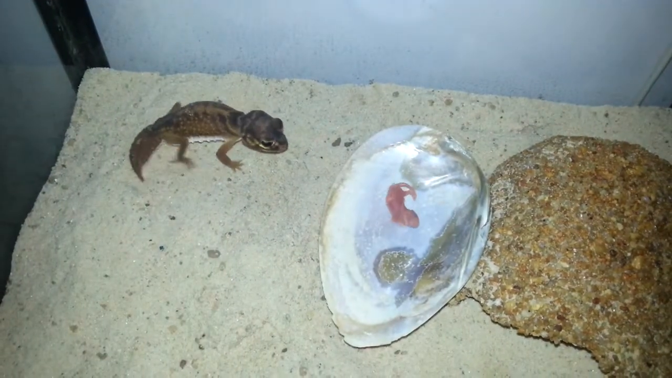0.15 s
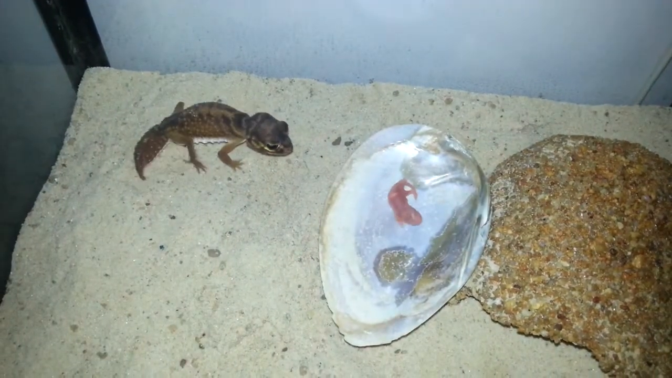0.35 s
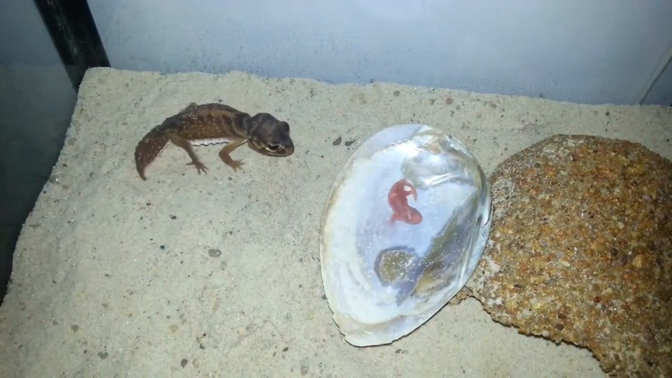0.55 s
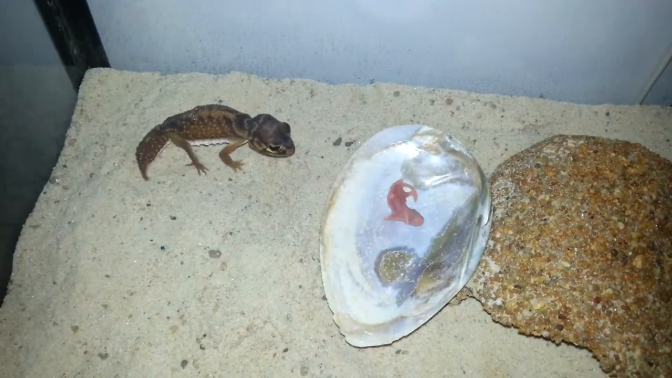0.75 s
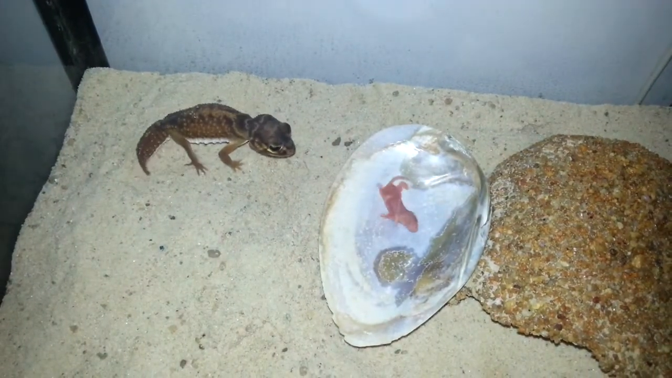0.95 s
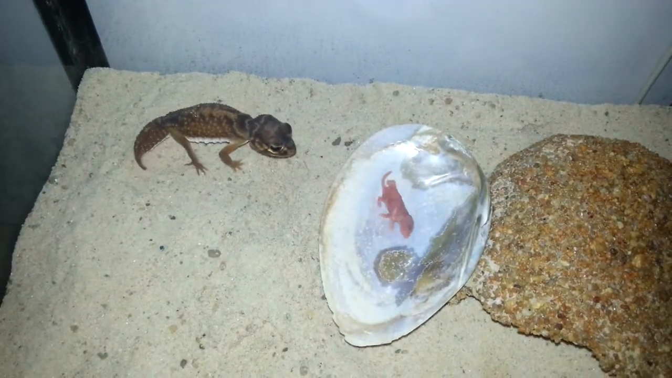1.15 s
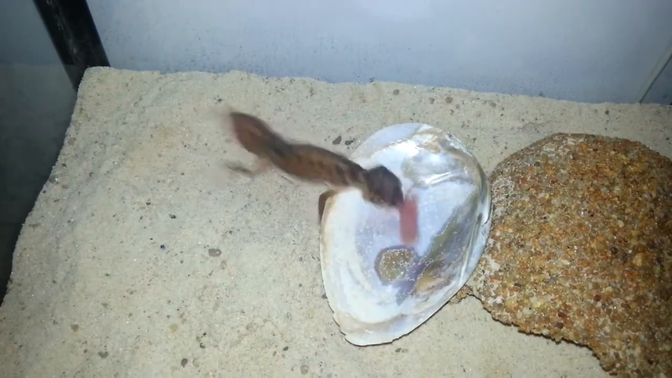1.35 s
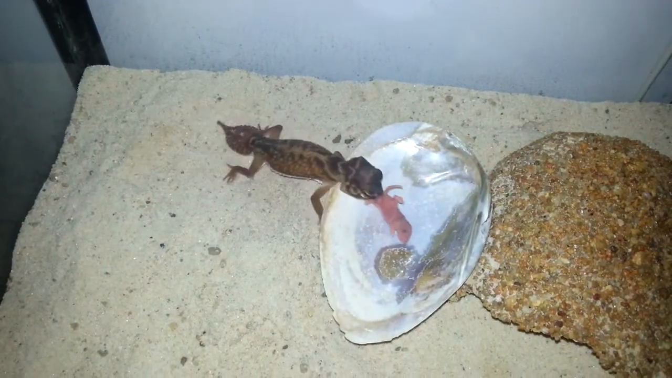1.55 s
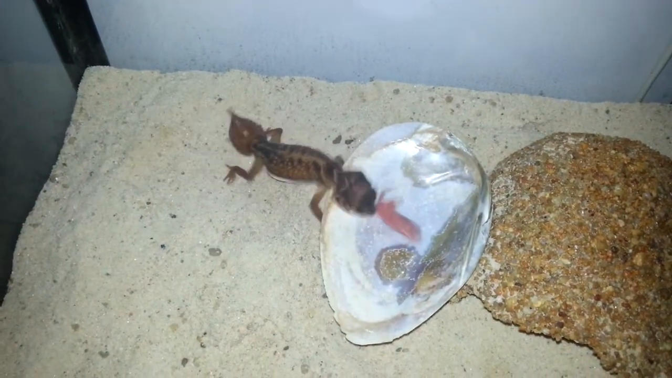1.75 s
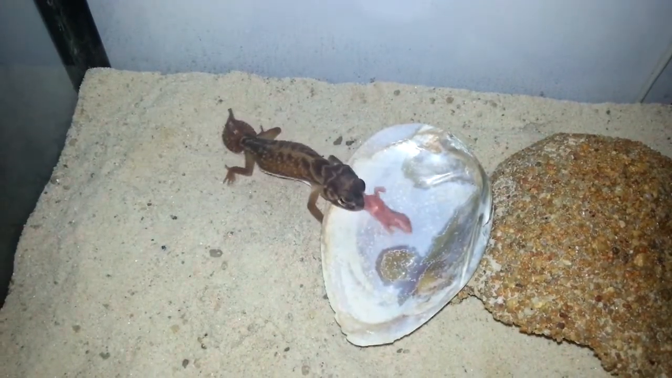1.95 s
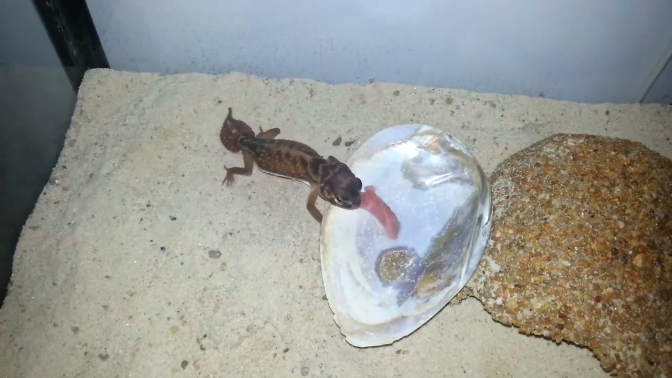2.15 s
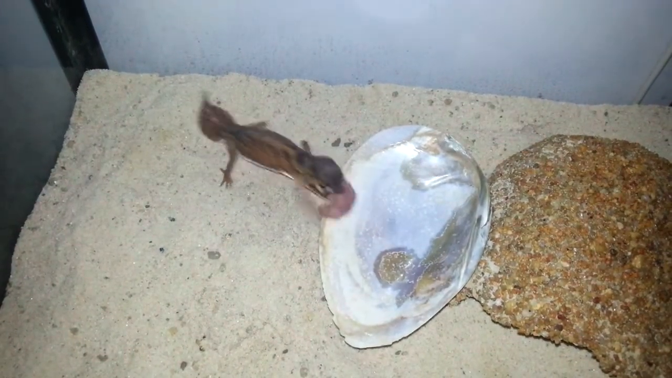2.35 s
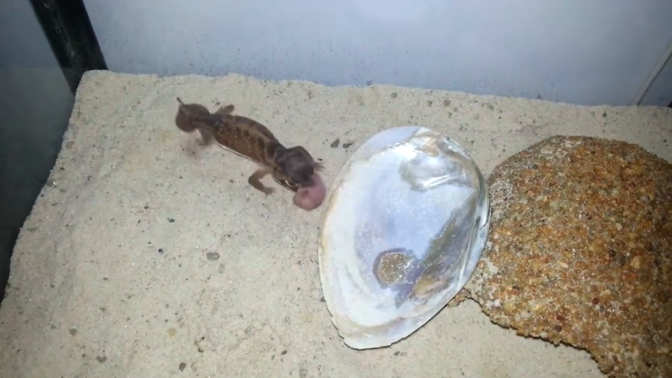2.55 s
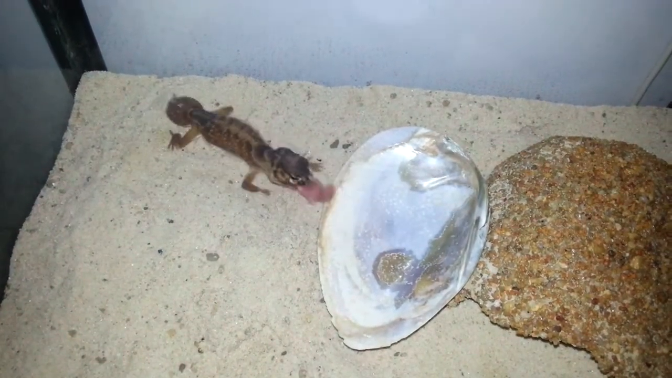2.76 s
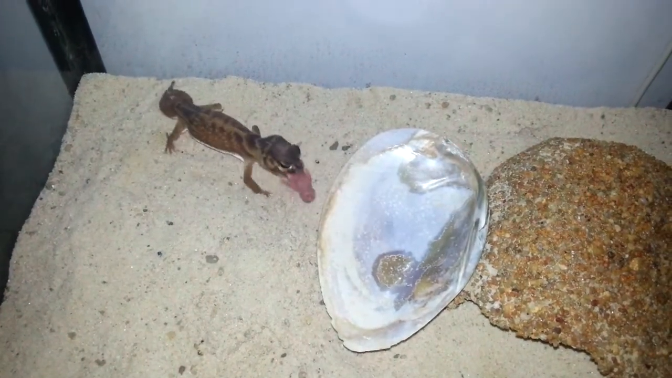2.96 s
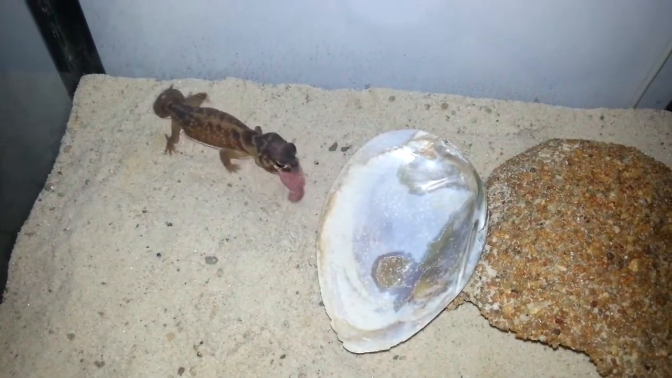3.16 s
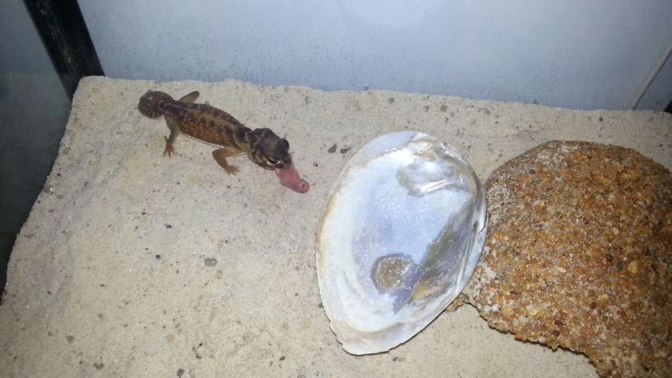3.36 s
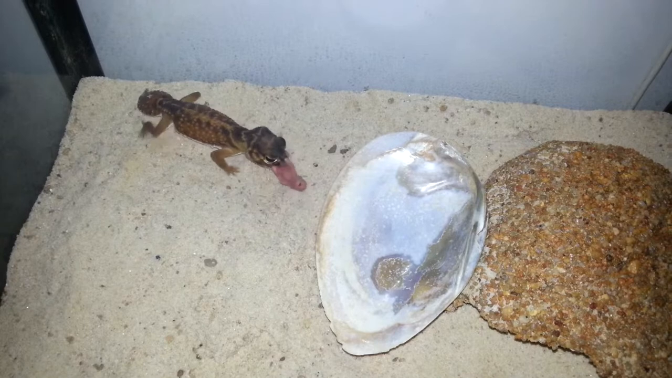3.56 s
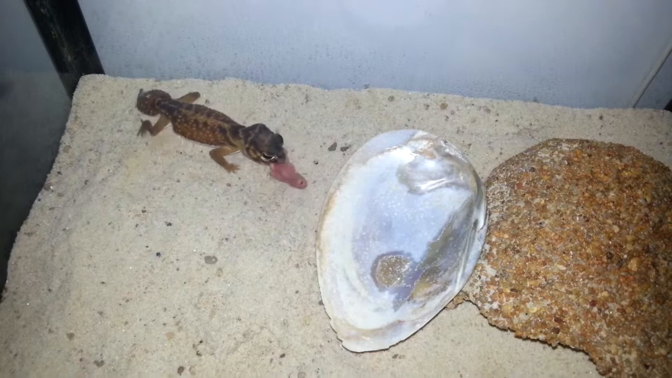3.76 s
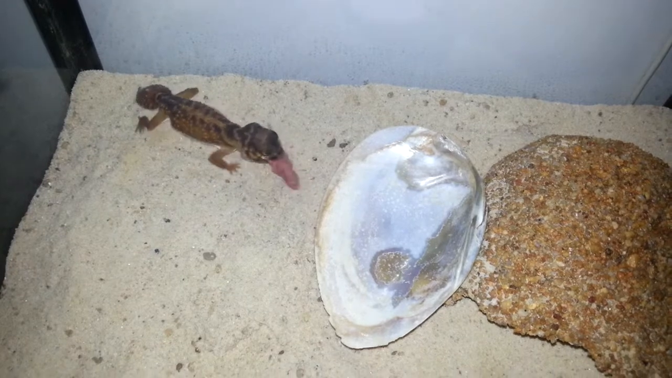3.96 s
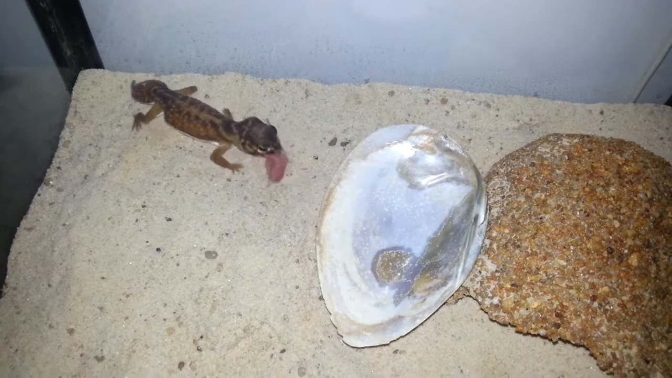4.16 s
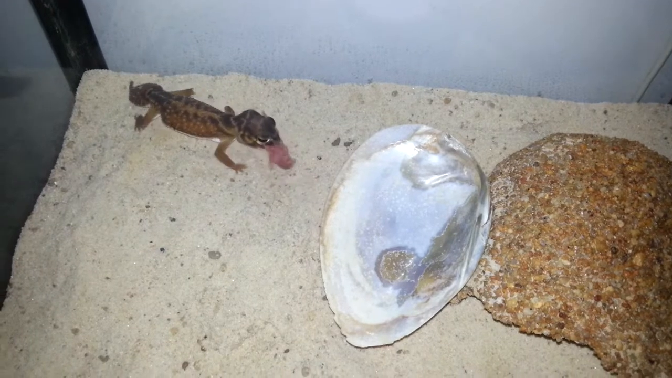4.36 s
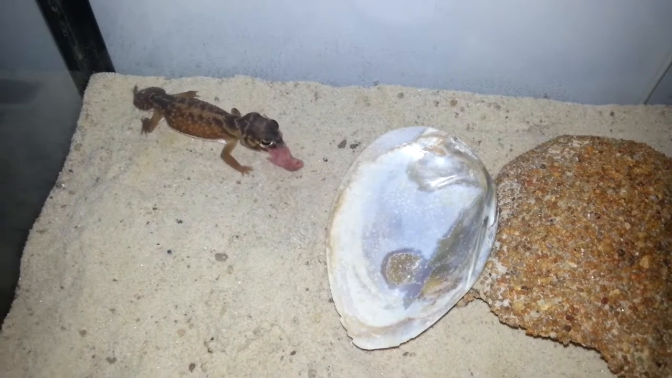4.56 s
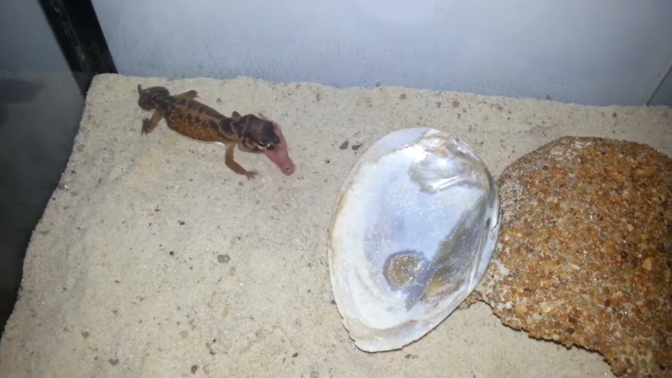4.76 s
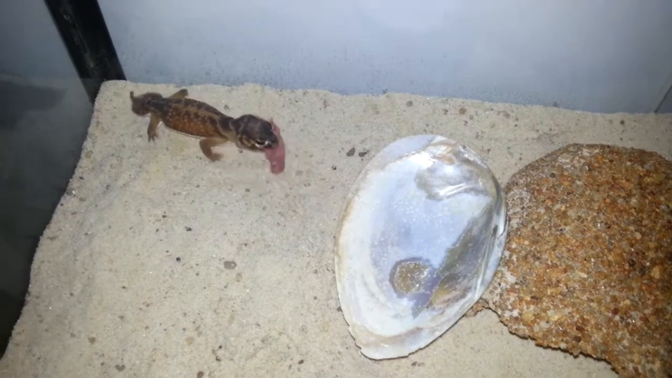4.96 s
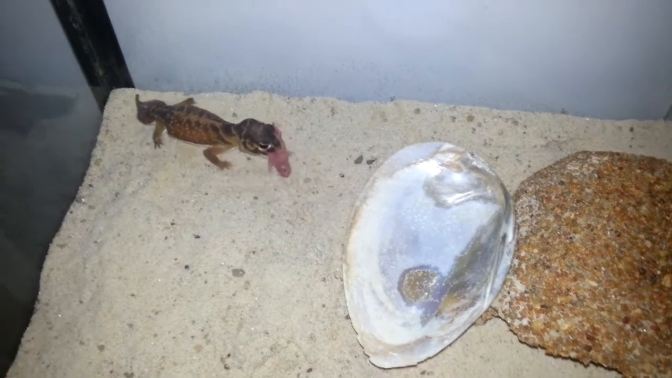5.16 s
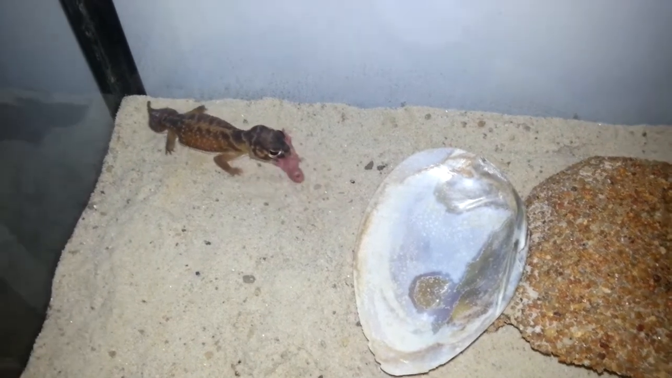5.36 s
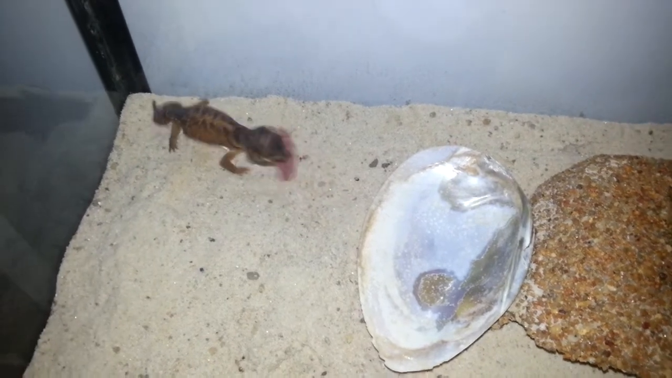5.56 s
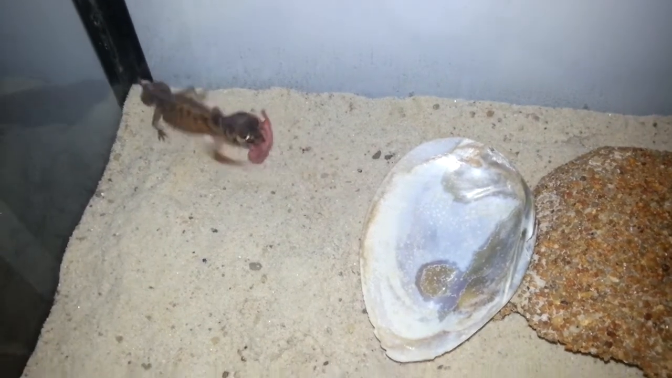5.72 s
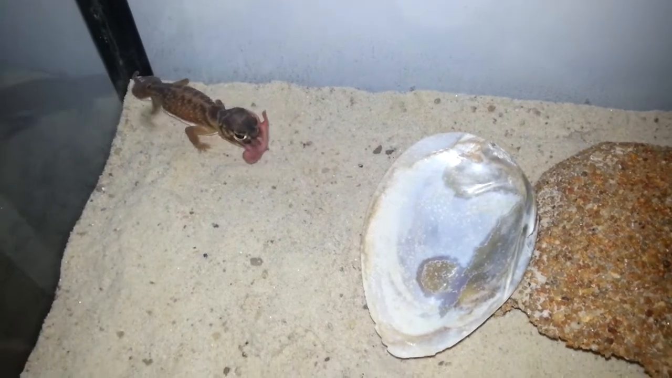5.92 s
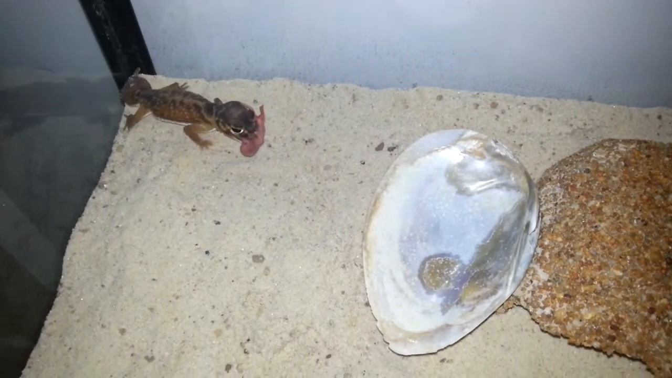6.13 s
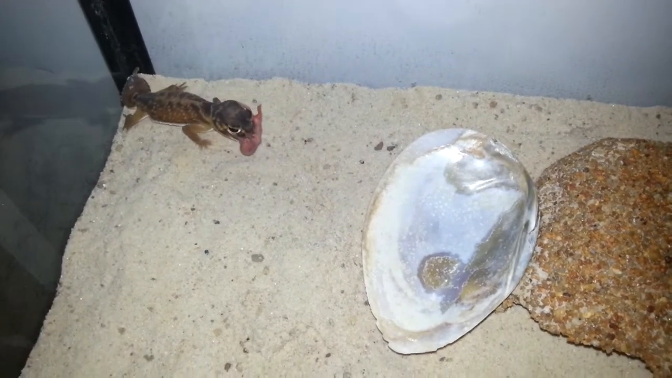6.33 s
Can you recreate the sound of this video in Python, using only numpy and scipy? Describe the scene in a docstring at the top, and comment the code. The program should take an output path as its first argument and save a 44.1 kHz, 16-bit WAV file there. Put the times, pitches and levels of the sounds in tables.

```python
"""Gecko squeaking over its prey

A small gecko seizes its prey in a sand-floored glass tank and squeaks while gripping it.
Each squeak is a thin, arching whistle from the larynx that frays into a hiss of air.
Feet and jaws tick on a shell dish and on the sand. The glass walls add quick echoes,
and the room hums quietly behind."""
import sys
import numpy as np
from scipy import signal
from scipy.fft import rfft, irfft
from scipy.io import wavfile
from scipy.ndimage import map_coordinates

SR = 44100
rng = np.random.default_rng(int(sys.argv[2]) if len(sys.argv) > 2 else 0)


def generate_wav(sig):
    """Save sig (samples, or channels by samples) to the path in sys.argv[1] as 16-bit PCM at SR."""
    pcm = np.round(np.clip(np.atleast_2d(sig).T, -1, 1) * 32767).astype(np.int16)
    wavfile.write(sys.argv[1], SR, pcm)


N = 281799
TIME = np.arange(N) / SR
FREQS = np.maximum(np.fft.rfftfreq(N, 1 / SR), 1)


def from_db(db):
    """Decibels to gain."""
    return 10 ** (np.asarray(db) / 20)


def rms_one(x):
    """Scale to unit power."""
    return x / np.sqrt(np.mean(x ** 2) + 1e-20)


def at_hz(curve, hz):
    """Read a curve on a log-frequency axis."""
    f, value = np.transpose(curve)
    return np.interp(np.log(hz), np.log(f), value)


def band(x, low_hz, high_hz):
    """Causal band-pass."""
    sos = signal.butter(2, [low_hz, min(high_hz, .45 * SR)], "band", fs=SR, output="sos")
    return signal.sosfilt(sos, x + 1e-18)


def noise(colour):
    """Unit-power noise shaped by an EQ curve."""
    return rms_one(irfft(rfft(rng.standard_normal(N)) * from_db(at_hz(colour, FREQS)), N))


def band_noise(low_hz, high_hz):
    """Unit-power noise in one band."""
    return rms_one(band(rng.standard_normal(N), low_hz, high_hz))


def wobble(rate_hz):
    """Unit-power random modulation up to about `rate_hz`."""
    return rms_one(irfft(rfft(rng.standard_normal(N)) / (1 + (FREQS / rate_hz) ** 4), N))


def gate(t, length, attack, release):
    """Open at t = 0, hold, close after `length`."""
    return np.clip(t / attack, 0, 1) * np.clip((length - t) / release + 1, 0, 1)


def strikes(cues, t60):
    """An envelope that jumps at each cue and dies away."""
    impulses = np.zeros(N)
    for start, db in cues:
        impulses[round(start * SR)] += from_db(db)
    return signal.lfilter([1], [1, -from_db(-60 / (t60 * SR))], impulses + 1e-18)


def bursts(cues, edge_s):
    """Soft-edged envelopes that sag over their length."""
    out = np.zeros(N)
    for start, length, db, fall_db in cues:
        t = TIME - start
        out += gate(t, length, edge_s, edge_s) * from_db(db - fall_db * np.clip(t / length, 0, 1))
    return out


def pitch_arch(t, rise, length, first_hz, top_hz, last_hz, bend):
    """The pitch shoots up, levels off, then heads for its last note; bend 1 is a straight line."""
    climb = np.clip(1 - t / rise, 0, 1) ** 2.8
    fall = np.clip((t - rise) / max(length - rise, 1 / SR), 0, 1) ** bend
    return top_hz - (top_hz - first_hz) * climb - (top_hz - last_hz) * fall


# Squeaks, the last split into two notes: t/s, rise/s, length/s, first f/Hz, top f/Hz, last f/Hz, bend,
# tremor/share of pitch, rasp/rad, tone/dB, crescendo/dB, overtones/dB,
# hiss/dB, hiss tail/s, sizzle/dB, snap/dB
SQUEAKS = [ (2.3286, 0.013, 0.059, 3570, 5830, 3890, 0.76, 0.031, 0.2, -14.5, -2, -2, -60, 0.0028, -26, -24),
           (3.3483, 0.021, 0.053, 2436, 3580, 1960, 2, 0.01, 0.11, -33, -9, 3, -33, 0.085, -31, -35),
           (3.7121, 0.029, 0.047, 2460, 4044, 3160, 1.16, 0.0047, 0.19, -33.5, -0.5, 5, -43, 0.011, -35.5, -34),
           (4.12, 0.021, 0.03, 1877, 2474, 2250, 0.68, 0.02, 0.19, -37.5, 1, 5.5, -33.5, 0.057, -31.5, -31),
           (4.593, 0.031, 0.057, 2425, 3764, 3160, 1.46, 0.0092, 0.11, -32.5, 1, 2, -34.5, 0.053, -28.5, -28),
           (4.7618, 0.0053, 0.01, 2890, 3346, 3420, 1.9, .01, 0.21, -29, 9.5, 0, -34, 0.0014, -31, -38),
           (4.7697, 0.0042, 0.015, 3770, 4500, 3800, 1.03, 0.0078, 0.52, -32.5, -3, -1, -43, 0.0078, -44, -41)]
# Whistle harmonics: multiple, level/dB
HARMONICS = [(1, -3.5), (2, -6), (3, -8), (4, -4.5), (5, -10)]
# Mouth resonances that the whistle sweeps through: f/Hz, level/dB
MOUTH_EQ = [(2000, -0.5), (4200, 2), (7000, -2.5), (7900, 1), (9000, -5), (10300, -1), (11700, 4),
            (13000, -1.5), (14300, -5)]
ATTACK_S, RELEASE_S = 0.0012, 0.001
TREMOR_HZ, EDGE_SAG_DB = 51.6, 6.5


def whistle():
    """A tiny larynx whistles a trembling arch of pitch, weaker at both ends."""
    tone = np.zeros(N)
    jitter = 1 + .013 * wobble(720)
    shimmer = from_db(1.8 * wobble(440))
    roughness = wobble(720)   # uneven cycles fray the high overtones most
    for squeak in SQUEAKS:
        start, rise, length, *contour = squeak[:7]
        tremor, rasp, level_db, crescendo_db, overtones_db, _, tail = squeak[7:14]
        on = (TIME > start) & (TIME < start + length + tail + RELEASE_S)
        t = TIME[on] - start
        hz = pitch_arch(t, rise, length, *contour) * jitter[on]
        hz *= 1 + tremor * np.cos(2 * np.pi * TREMOR_HZ * (t - rise))
        phase = 2 * np.pi * np.cumsum(hz) / SR + rasp * roughness[on]
        progress = np.clip(t / length, 0, 1)
        effort = np.sin(np.pi * progress)
        swell_db = level_db + crescendo_db * (progress - .5) - EDGE_SAG_DB * (1.5 - effort)
        swell = gate(t, length, ATTACK_S, RELEASE_S) * from_db(swell_db)
        for k, db in HARMONICS:
            colour_db = db + (k > 1) * overtones_db + at_hz(MOUTH_EQ, k * hz)
            tone[on] += swell * from_db(colour_db) * np.sin(k * phase) * (k * hz < SR / 2)
    return np.sqrt(2) * shimmer * tone


# Voiceless hisses: t/s, length/s, hiss/dB, fall/dB, sizzle/dB, snap/dB
HISSES = [(2.817, 0.074, -37, 23, -31.5, -33.5), (3.798, 0.066, -44.5, 2.5, -44, -55)]
# Colour of the breath: f/Hz, level/dB
BREATH_EQ = [(500, -39), (1400, -20.5), (2200, -14), (3400, -11.5), (4700, -9), (6200, -13), (8300, -12),
             (10500, -16.5), (12300, -13), (13200, -17), (14200, -9), (15500, -7)]
HISS_DUCK_DB, HISS_FALL_DB_PER_S, SIZZLE_FALL_DB_PER_S = 10, 176, 151


def mouth_hiss(breath_db):
    """Air hisses through the mouth, grainy with saliva, with a narrow sizzling resonance on top."""
    air = bursts([(s, length, db, fall) for s, length, db, fall, _, _ in HISSES], edge_s=0.0023)
    jet = bursts([(s, length, db, fall) for s, length, _, fall, db, _ in HISSES], edge_s=0.0015)
    for start, _, length, *_, air_db, tail, sizzle_db, _ in SQUEAKS:
        on = (TIME > start) & (TIME < start + length + tail + RELEASE_S)
        t = TIME[on] - start
        flow = gate(t, length + tail, ATTACK_S, RELEASE_S)
        duck_db = HISS_DUCK_DB * (1 - np.clip(t / length, 0, 1) ** 3)   # lifts as the whistle frays
        fade_db = HISS_FALL_DB_PER_S * np.maximum(t - length, 0)   # the air runs out
        air[on] += flow * from_db(air_db - duck_db - fade_db)
        jet[on] += flow * from_db(sizzle_db - SIZZLE_FALL_DB_PER_S * t)
    saliva = from_db(1.23 * wobble(540))
    sizzle = jet * band_noise(13240, 14770)
    breath = air * from_db(breath_db) * noise(BREATH_EQ)
    return saliva * (breath + sizzle)


def jaw_snaps():
    """The jaws part with a bright snap at the start of each squeak and hiss."""
    openings = [(row[0], row[-1]) for row in SQUEAKS + HISSES]
    return strikes(openings, t60=0.03) * band_noise(7500, 18000)


# Low accent inside the loudest squeak: t/s, length/s, level/dB, fall/dB
BUZZ = [(2.343, 0.029, -31.5, 19)]
# Colour of its thud: f/Hz, level/dB
THUD_EQ = [(90, -19.5), (170, 3), (400, -3), (650, -18.5), (1400, -11.5), (2200, -27), (3500, -53)]


def low_buzz(pitch_hz, sink_per_s, buzz_db, thud_db):
    """A dull thud with a short, rough, sinking buzz, far below the whistle."""
    start, length = BUZZ[0][:2]
    hz = pitch_hz * (1 - sink_per_s * np.clip(TIME - start, 0, length))
    hz *= 1 + .045 * wobble(356)
    phase = 2 * np.pi * np.cumsum(hz) / SR
    buzz = sum(from_db(-3 * k) * np.sin((k + 1) * phase) for k in range(4))
    return bursts(BUZZ, edge_s=0.004) * (from_db(buzz_db) * buzz + from_db(thud_db) * noise(THUD_EQ))


# Hits on the dish and the tank: t/s, knock/dB, shell ring/dB
KNOCKS = [(1.387, -33, -56), (1.408, -31, -50), (1.4207, -18.5, -28), (1.7931, -21.5, -52),
          (2.7682, -31.5, -62), (5.6204, -38, -54), (5.665, -39, -58), (5.6887, -38, -46)]
# Colour of a knock: f/Hz, level/dB
KNOCK_EQ = [(500, -29), (1500, 4), (2200, -7), (2700, 0), (3300, 6.5), (4500, 3), (6000, -22), (9000, -26),
            (15000, -10)]


def knocks():
    """Feet and jaws strike: a dry crack, a faint tail and the high ring of the shell."""
    blows = [(s, db) for s, db, _ in KNOCKS]
    rings = [(s, db) for s, _, db in KNOCKS]
    crack = from_db(-8) * strikes(blows, t60=0.0054)
    tail = from_db(-25) * strikes(blows, t60=0.1)
    shell = strikes(rings, t60=0.01) * band_noise(2760, 4560)
    return (crack + tail) * noise(KNOCK_EQ) + shell


# Claw strokes: t/s, level/dB
SCRATCHES = [(0.134, -53.5), (0.312, -55.5), (0.686, -54.5), (0.811, -55), (1.776, -52), (1.967, -55),
             (2.972, -48.5), (3.973, -54.5), (4.025, -55), (4.385, -56), (5.068, -54)]
# Colour of the grit: f/Hz, level/dB
GRIT_EQ = [(600, -11), (1500, 1), (2600, -5.5), (3600, 3.5), (5000, -5), (7000, -11), (15000, -9)]


def claw_scratches():
    """Claws scratch the sand in short, gritty strokes."""
    grit = rms_one(noise(GRIT_EQ) * from_db(5.4 * wobble(810)))
    return strikes(SCRATCHES, t60=0.044) * grit


# Bright ticks: t/s, level/dB
TICKS = [(0.134, -51), (1.43, -50), (1.785, -41.5), (1.794, -48), (2.075, -47), (2.516, -43), (2.888, -48),
         (3.055, -47), (3.073, -47), (3.455, -44), (3.465, -46), (4.210, -39.5), (4.227, -39.5),
         (5.524, -62), (5.667, -47)]
# Dull taps: t/s, level/dB
TAPS = [(1.793, -30), (2.482, -33), (5.419, -45), (5.524, -31.5)]


def ticks_and_taps():
    """The wet mouth and flicked grains tick, among a few dull taps."""
    ticks = strikes(TICKS, t60=0.018) * band_noise(1300, 21000)
    taps = strikes(TAPS, t60=0.01) * band_noise(420, 1600)
    return ticks + taps


# Scuffs: t/s, length/s, level/dB, fall/dB
SCUFFS = [(1.406, 0.0074, -45, 4), (1.422, 0.23, -45.5, 37), (2.39, 0.17, -50.5, 9.5),
          (5.65, 0.162, -52.5, 14)]
# Colour of the sand: f/Hz, level/dB
SAND_EQ = [(200, 13.5), (800, 5.5), (3000, -5), (6000, -1), (10000, -3), (15000, -6)]


def sand_scuffs():
    """Scuffed sand gives a grainy, fading rustle."""
    return bursts(SCUFFS, edge_s=0.0031) * noise(SAND_EQ) * from_db(3.2 * wobble(237))


# The landing: t/s, length/s, level/dB, fall/dB
LUNGE = [(1.424, 0.174, -50, 9)]


def lunge():
    """The body lands and the tank floor rumbles."""
    return bursts(LUNGE, edge_s=.012) * band_noise(98, 280)


def delay_response(ms):
    """Frequency response of a pure delay."""
    return np.exp(-2j * np.pi * FREQS * ms / 1000)


def scatter(x, loops_ms, feedback=.72):
    """All-pass loops smear the sound over a few milliseconds without colouring it."""
    for ms in loops_ms:
        trip = delay_response(ms)
        x = irfft(rfft(x) * (feedback + trip) / (1 + feedback * trip), N)
    return x


# Reflections off the glass: left delay/ms, right delay/ms, level/dB
GLASS_ECHOES = [(.35, .8, -9), (1.9, 1.3, -12), (3.1, 3.6, -16)]
# Stereo tilt, applied 1.5 times on the left and 0.5 times on the right: f/Hz, left minus right/dB
STEREO_TILT = [(60, -25.5), (99, 6.5), (160, 0), (270, -9), (450, -2.5), (740, -3), (1220, -2), (2010, 2),
               (3330, 3.5), (5500, -1), (9080, 1), (15000, -4.5)]
RING_DB, RING_T60_S = -10, .04
ROOM_DB, ROOM_T60_S = -21, .22


def tank(x, pan_db, lag_ms):
    """Two microphones hear the direct sound, the nearest panes, the ringing tank and a faint room."""
    late = map_coordinates(x, [np.arange(N) - lag_ms * SR / 1000], order=5)
    left = scatter(late * from_db(pan_db / 2), loops_ms=(.21, .59))
    right = scatter(x * from_db(-pan_db / 2), loops_ms=(.33, .47))
    t = TIME[:SR // 2]
    out = []
    for side, direct in enumerate([left, right]):
        panes = sum(from_db(echo[2]) * delay_response(echo[side]) for echo in GLASS_ECHOES)
        heard = direct + irfft(rfft(direct) * panes, N)
        for db, t60, top_hz in [(RING_DB, RING_T60_S, 16000), (ROOM_DB, ROOM_T60_S, 13000)]:
            tail = band(rng.standard_normal(len(t)), 100, top_hz) * from_db(-60 * t / t60) * (t > .001)
            heard += from_db(db) * signal.fftconvolve(direct, tail / np.linalg.norm(tail))[:N]
        tilt = from_db((1.5 - side) * at_hz(STEREO_TILT, FREQS))
        out.append(irfft(rfft(heard) * tilt, N))
    return np.array(out)


# Head turns: t/s, left minus right/dB, left lag/ms
HEAD_TURNS = [(2.345, -1, 0.078), (2.39, 3, 0.072), (2.83, -0.5, 0.59), (3.38, -0.5, 0.7),
              (3.74, 0.5, 0.77), (4.15, 3.5, 0.74), (4.77, 2, 0.8)]


def head_turns():
    """The turning head shifts the voice's pan and its lag between the microphones."""
    times, pan_db, lag_ms = np.transpose(HEAD_TURNS)
    return np.interp(TIME, times, pan_db), np.interp(TIME, times, lag_ms)


# Colour of the room tone: f/Hz, level/dB
ROOM_EQ = [(15, -83), (25, -17.5), (45, -17), (118, -3.5), (172, -8), (202, -7), (224, -9), (394, -11.5),
           (573, -13.5), (637, -14.5), (2240, -23.5), (2630, -25), (6200, -32), (13800, -29),
           (15000, -40.5)]
# Its fader moves, before the trims: t/s, rumble/dB, hiss/dB
ROOM_FADERS = [(0.0, -63, -69), (4.27, -60, -66.5), (5.53, -60, -67), (6.39, -63, -68.5)]
# Its stereo image: f/Hz, left-right correlation
ROOM_CORRELATION = [(30, 0.22), (120, 0.54), (300, 0.021), (1000, 0.059), (15000, 0.017)]


def room_tone(rumble_trim_db, hiss_trim_db, boom_hz, boom_width_hz, boom_db):
    """The room rumbles with one boomy resonance under a faint hiss."""
    times, rumble_db, hiss_db = np.transpose(ROOM_FADERS)
    resonance_db = boom_db / (1 + ((FREQS - boom_hz) / boom_width_hz) ** 2)
    mid, side = rfft(rng.standard_normal((2, N))) * from_db(at_hz(ROOM_EQ, FREQS) + resonance_db)
    alike = at_hz(ROOM_CORRELATION, FREQS)
    stereo = np.sqrt(1 + alike) * mid + np.sqrt(1 - alike) * side * [[1], [-1]]
    lows = 1 / (1 + (FREQS / 2500) ** 4)
    rumble = rms_one(irfft(stereo * lows, N)) * from_db(np.interp(TIME, times, rumble_db))
    hiss = rms_one(irfft(stereo * (1 - lows), N)) * from_db(np.interp(TIME, times, hiss_db))
    return from_db(rumble_trim_db) * rumble + from_db(hiss_trim_db) * hiss


# Motor partials, before the trim: f/Hz, level/dB
HUM_PARTIALS = [(199.2, -73.5), (398.4, -79.5)]


def motor_hum(trim_db):
    """A motor hums, each partial drifting in level and phase."""
    hum = np.zeros(N)
    for hz, db in HUM_PARTIALS:
        level = from_db(db + trim_db + 2.5 * wobble(3))
        hum += level * np.sin(2 * np.pi * hz * TIME + 0.25 * wobble(2))
    return hum


def scene():
    """The gecko's voice and movements in the tank, over the room."""
    voice = from_db(0.5) * whistle() + jaw_snaps() + mouth_hiss(breath_db=-1.5)
    calls = tank(voice, *head_turns())
    foley = knocks() + claw_scratches() + ticks_and_taps() + sand_scuffs() + lunge()
    foley += low_buzz(pitch_hz=452, sink_per_s=3.2, buzz_db=-1.0, thud_db=-5.5)
    body = tank(band(foley, 140, 19000), pan_db=0.5, lag_ms=0.075)
    room = room_tone(rumble_trim_db=4.0, hiss_trim_db=4.5, boom_hz=131.3, boom_width_hz=19, boom_db=5.0)
    return calls + body + room + motor_hum(trim_db=5.5)


def record(dry):
    """A steep low-pass cuts the very top."""
    cutoff_hz = 14650
    return signal.sosfilt(signal.ellip(10, .3, 70, cutoff_hz, fs=SR, output="sos"), dry)


dry = scene()
out = record(dry)
generate_wav(out)
```